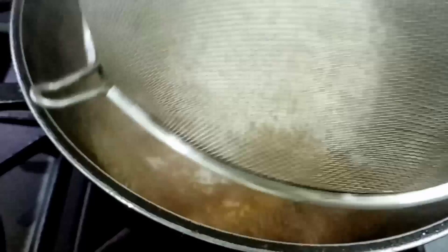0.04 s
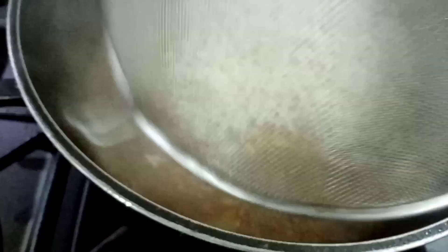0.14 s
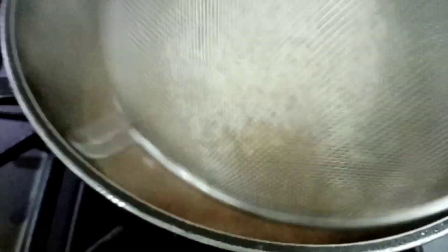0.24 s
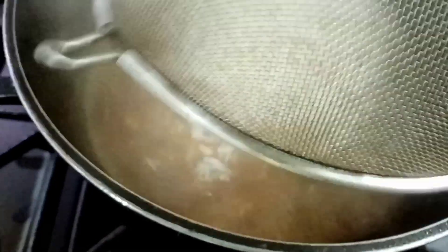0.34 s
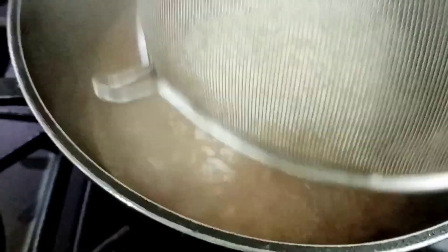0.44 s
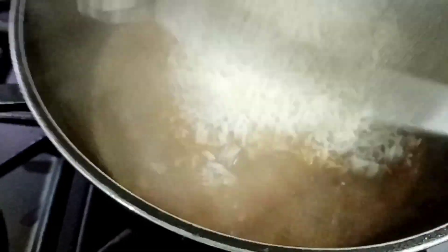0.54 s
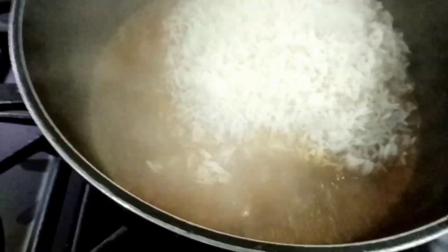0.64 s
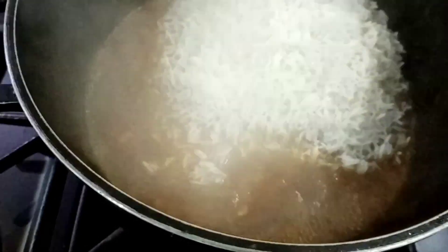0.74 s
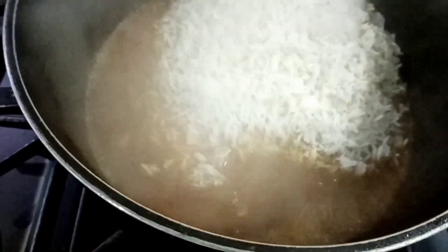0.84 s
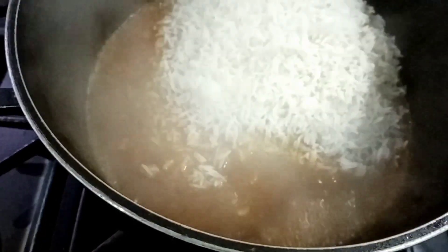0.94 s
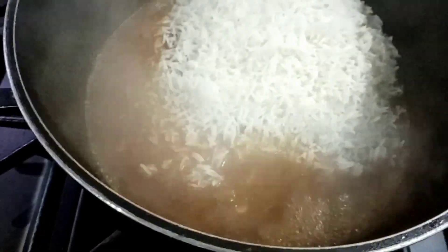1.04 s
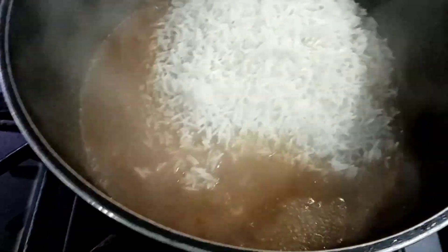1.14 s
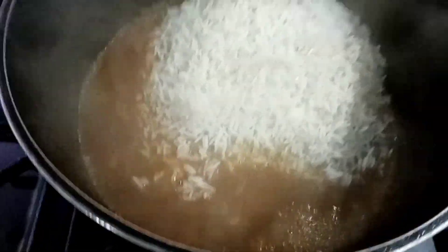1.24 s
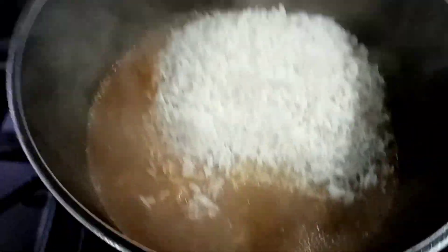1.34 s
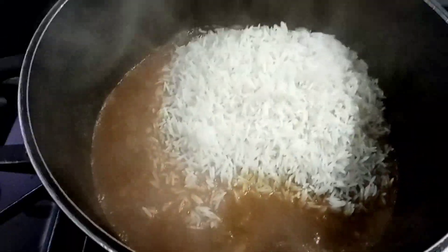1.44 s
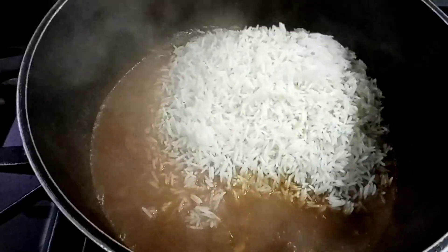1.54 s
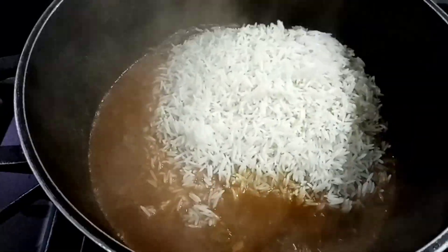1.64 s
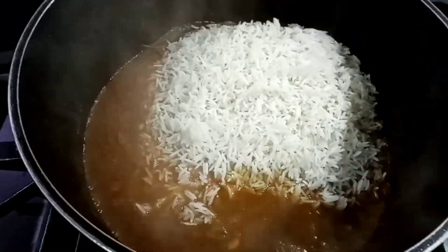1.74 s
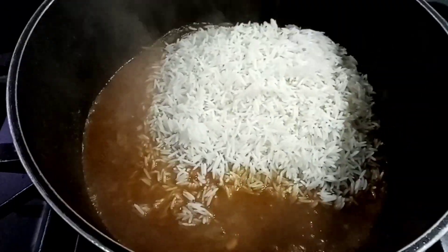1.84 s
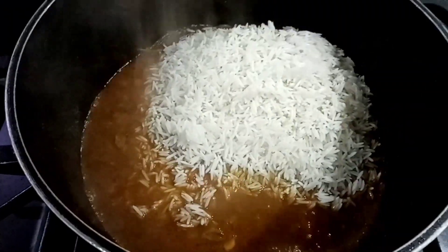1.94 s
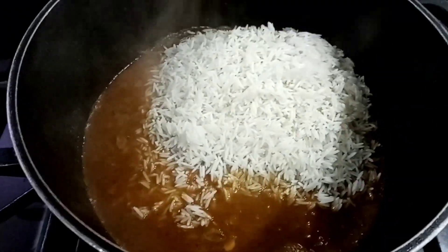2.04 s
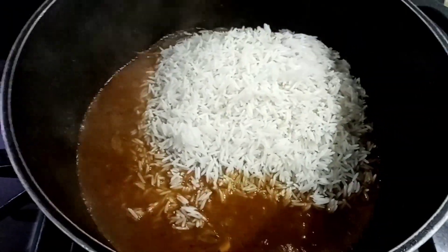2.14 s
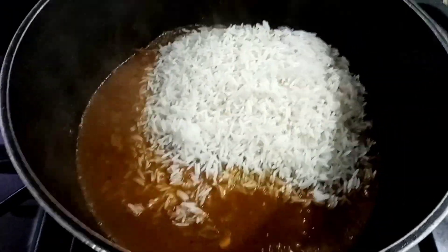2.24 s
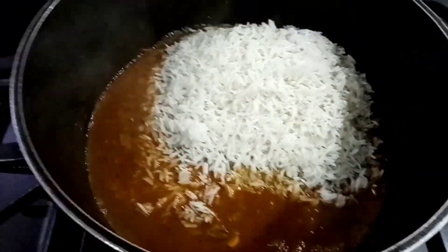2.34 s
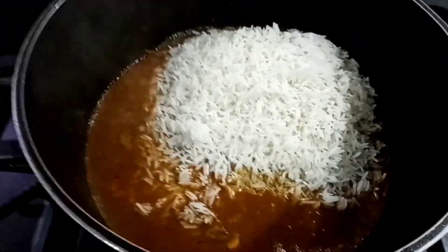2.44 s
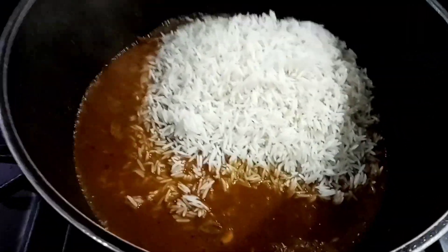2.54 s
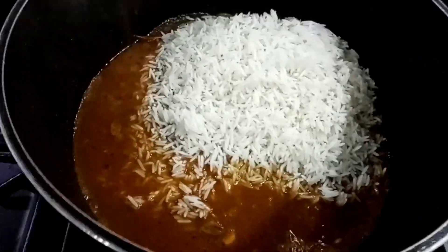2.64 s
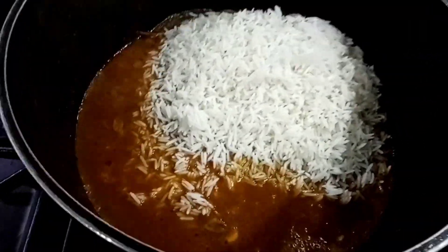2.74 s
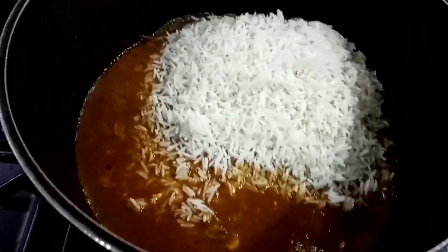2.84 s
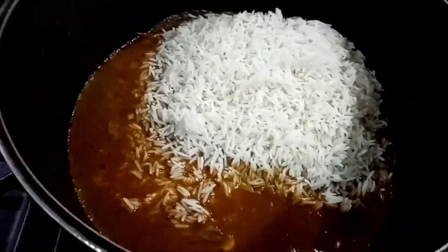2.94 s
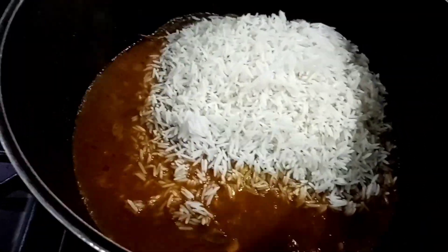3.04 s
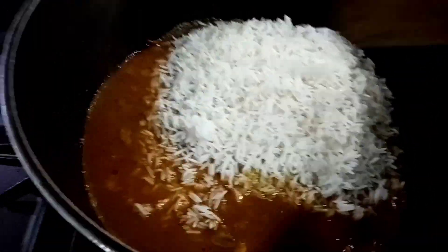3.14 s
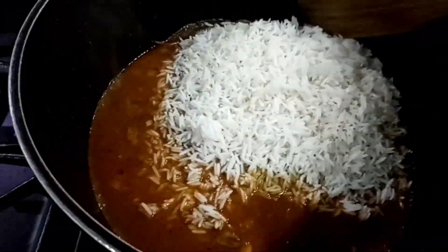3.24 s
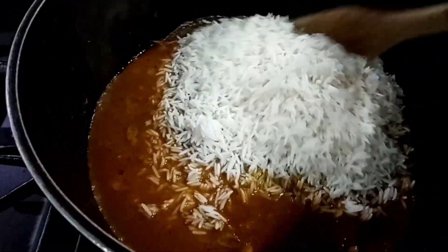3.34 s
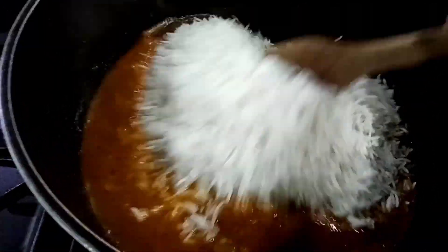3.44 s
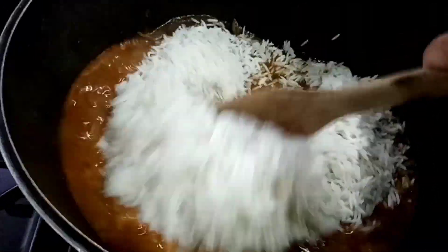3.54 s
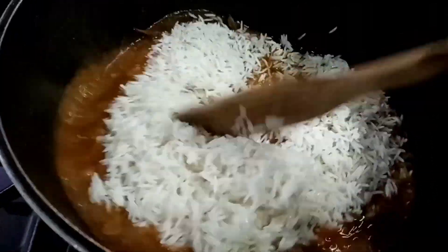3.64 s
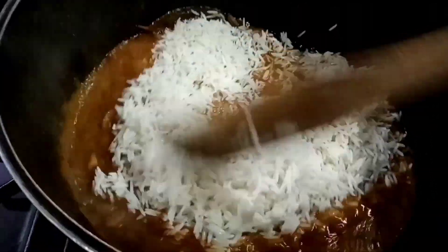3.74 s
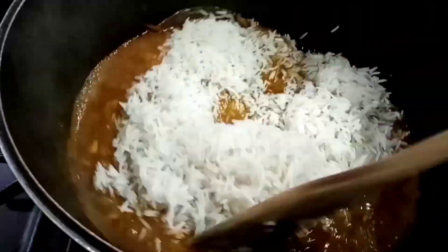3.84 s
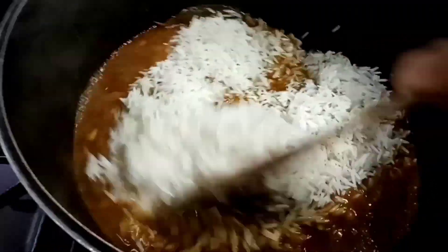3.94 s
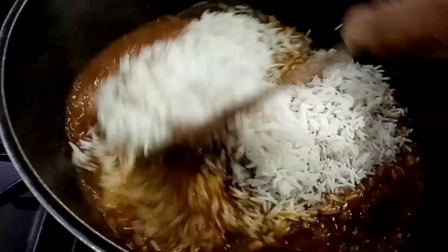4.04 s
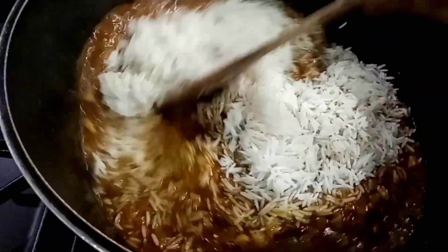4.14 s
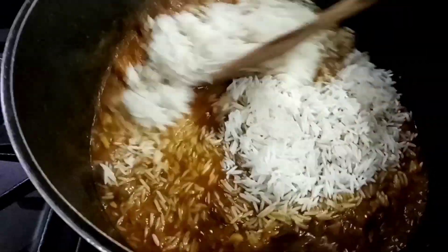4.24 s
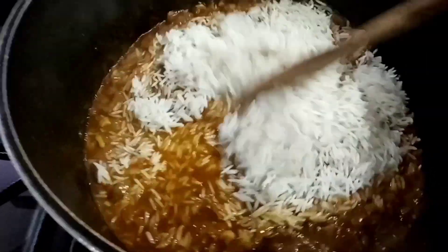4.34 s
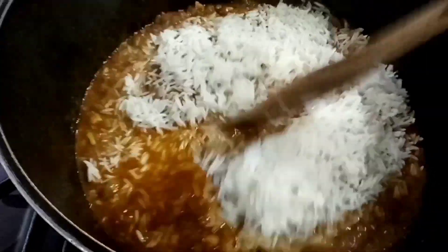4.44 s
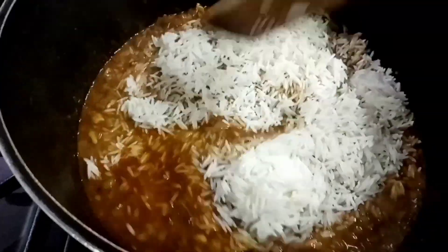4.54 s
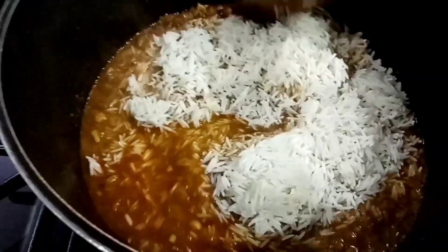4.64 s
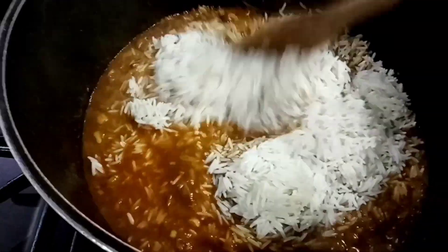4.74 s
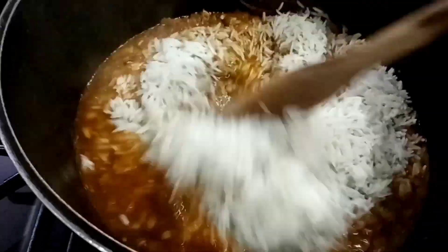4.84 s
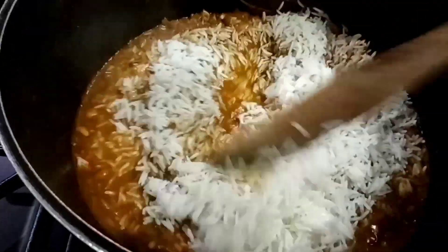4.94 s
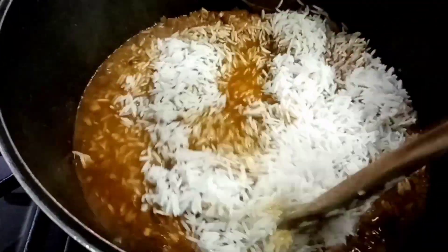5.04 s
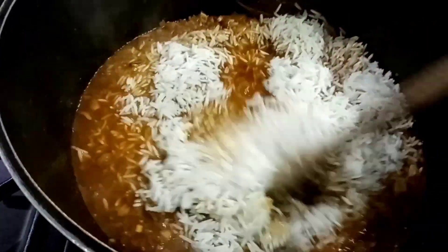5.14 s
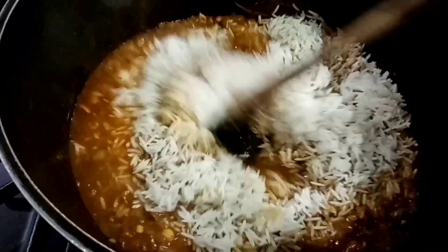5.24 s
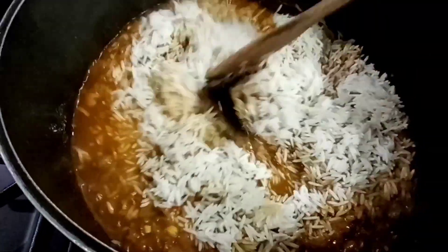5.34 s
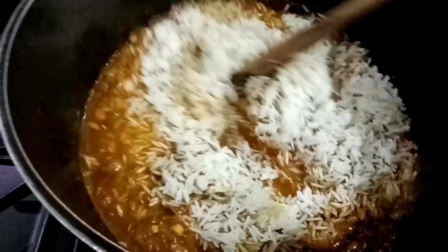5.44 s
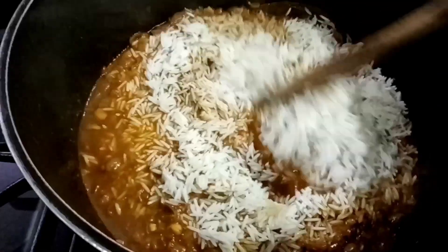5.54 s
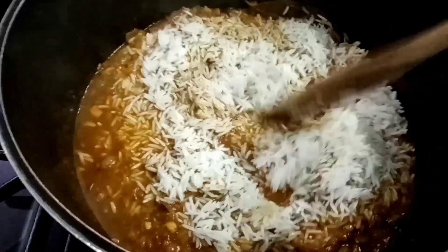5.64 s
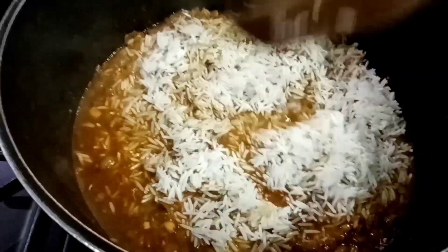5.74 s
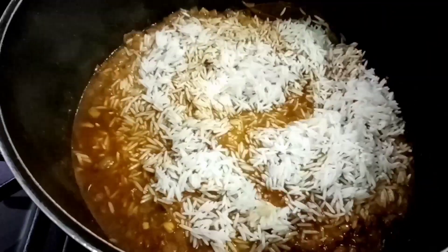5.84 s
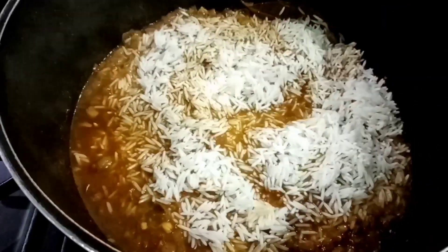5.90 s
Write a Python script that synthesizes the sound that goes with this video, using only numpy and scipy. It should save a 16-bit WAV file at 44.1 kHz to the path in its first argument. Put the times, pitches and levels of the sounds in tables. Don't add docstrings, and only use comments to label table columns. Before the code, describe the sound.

A wire strainer clangs three times on a pot rim, clatters onto a counter, then a wooden spoon rattles and stirs rice in fizzing broth.

```python
import sys
import numpy as np
from scipy import signal
from scipy.fft import rfft, irfft
from scipy.io import wavfile
from scipy.ndimage import uniform_filter1d, minimum_filter1d

SR = 44100
rng = np.random.default_rng(int(sys.argv[2]) if len(sys.argv) > 2 else 0)


def elevation(decibels):
    levels = np.asarray(decibels, float)
    return 10 ** (levels / 20)


def generate_wav(signal):
    frames = np.transpose(np.atleast_2d(signal))
    scaled = np.clip(frames, -1, 1) * 32767
    pcm = np.round(scaled).astype(np.int16)
    wavfile.write(sys.argv[1], SR, pcm)


N = 263277
T = np.arange(N) / SR
COUNTER_LEAD, HANDLE_LEAD = 15, 9


def unit(x):
    return x / np.sqrt(np.mean(x ** 2))


def peak(x):
    return x / np.abs(x).max()


def colour(x, points):
    hz, db = np.transpose(points)
    f = np.maximum(np.fft.rfftfreq(x.shape[-1], 1 / SR), 1)
    return irfft(rfft(x) * elevation(np.interp(np.log(f), np.log(hz), db)), x.shape[-1])


def band(x, lo_hz, hi_hz):
    sos = signal.butter(2, [lo_hz, min(hi_hz, SR / 2.2)], "bandpass", fs=SR, output="sos")
    return signal.sosfilt(sos, x)


def walk(rate):
    k = int(SR / rate)
    held = np.repeat(rng.standard_normal(N // k + 1), k)
    return 1.2 * uniform_filter1d(uniform_filter1d(held, k), k)[:N]


def curves(table):
    s, *columns = np.transpose(table)
    return [np.interp(T, s, c) for c in columns]


def grains(rate, spread_db):
    clicks = (rng.random(N) < rate / SR) * rng.standard_normal(N)
    return clicks * elevation(spread_db * np.minimum(rng.exponential(size=N), 5))


def glide(x, hz, width_hz, order=1):
    sos = signal.butter(order, width_hz / 2, fs=SR, output="sos")
    slow = signal.sosfilt(sos, x[0] + 1j * x[1])
    return unit((slow * np.exp(2j * np.pi * np.cumsum(hz) / SR)).real)


def aside(x, lead, left_db):
    return np.array([elevation(left_db) * x, np.roll(x, -lead)])


def ringing(modes, spot_hz, rough, chance):
    t = T[:SR // 3]
    hz, db, t60 = np.array(modes, float).T[:, :, None]
    phase = 2 * np.pi * hz * t + rough * hz / 3000 * np.cumsum(chance, axis=1)
    level_db = db - 6 * np.abs(np.log2(hz / spot_hz)) + 2 * chance[:, :1]
    return (elevation(level_db) * np.sin(phase) * 1000 ** (-t / np.minimum(t60, 0.45))).sum(0)


def thudding(hz, t60, noise):
    t = T[:SR // 3]
    decay = 1000 ** (-t / t60)
    tone = np.sin(2 * np.pi * hz * t) + 0.18 * np.sin(2 * np.pi * 1.5 * hz * t)
    return (tone + unit(band(noise, 125, 3 * hz))) * decay


def blows(events, modes, crack, contact_ms, ring_db, spot_db, spot_t60, thud_hz, thud_t60, rough,
          echo_db, rise_s=0.0017):
    out, t = np.zeros((2, N + SR)), T[:SR // 3]
    rise = 1 - np.exp(-t / rise_s)
    push = rise * np.exp(-2000 * t / contact_ms)
    for s, peak_db, spot_hz, thud_db, tilt_db in events:
        chance = rng.standard_normal((len(modes) + 1, len(t)))
        ring = ringing(modes + [(spot_hz, spot_db, spot_t60)], spot_hz, rough, chance)
        thud = peak(thudding(thud_hz, thud_t60, chance[0]) * (1 - np.exp(-t / 0.0021)))
        snap = peak(push * colour(rng.standard_normal(len(t)), crack))
        even = unit(colour(1. * (t == t[256]), crack)) * np.std(snap)
        main = np.array([snap, even]) + elevation([[ring_db], [ring_db - 8]]) * peak(ring * rise)
        main = band(colour(main, [(1000, 0.0082), (8000, tilt_db)]), 216, 17700)
        hit = main / np.abs(main[0]).max() + elevation([[thud_db], [thud_db - 4]]) * thud
        i = int(s * SR)
        out[:, i:i + len(t)] += elevation([[peak_db], [peak_db + echo_db]]) * hit
    return out[:, :N]


# pitch_hz, rms_db
HUM = [(100.2, -44.5), (200.4, -62.5), (300.6, -86)]


def hum():
    waver = .5 * walk(1.5) + .03 * walk(60)
    sway_db = 1.2 * walk(6) + 1.1 * walk(50)
    between = np.array([[.15], [0]])
    out = 0
    for k, (hz, db) in enumerate(HUM, 1):
        level = 2 ** .5 * elevation(db + sway_db + (k - 1) * 1.65 * walk(12))
        out = out + level * np.sin(2 * np.pi * hz * T + k * (waver + between))
    return out


# time_s, fizz_db
FIZZ = [(.6, -63.5), (1.8, -65), (2.1, -66), (2.56, -61.5), (2.9, -63.5), (3.25, -62), (3.5, -61),
        (4.3, -64), (4.85, -64), (5.05, -62), (5.3, -64.5), (5.8, -65)]
# freq_hz, density_db_per_hz
FIZZ_COLOUR = [(30, -22), (80, -12.5), (118, -4), (145, -16), (200, -9.5), (330, -18.5), (460, -18.5),
               (1000, -17), (1600, -22.5), (2400, -24.5), (6100, -27.5), (11000, -31.5), (16000, -23)]


def broth(shared):
    db, = curves(FIZZ)
    burst = 1 + 0.18 * unit(signal.lfilter([1], [1, -.985], np.abs(grains(34, 0.55))))
    seethe_db = 0.55 * walk(13) + 1.2 * walk(30)
    share = np.sqrt(np.clip([shared, 1 - shared], 0, 1))
    out = 0
    for hz in 32 * 2. ** np.arange(10):
        noise = rng.standard_normal((3, N))
        noise = band(share[0] * noise[0] + share[1] * noise[1:], hz / 2 ** .5, hz * 2 ** .5)
        level = burst * elevation(db + seethe_db) if hz > 1200 else elevation(np.mean(db))
        out = out + noise * elevation(0.91 * walk(7.6)) * level
    steady = colour(rng.standard_normal(N), FIZZ_COLOUR)
    return colour(out, FIZZ_COLOUR) / np.std(band(steady, 1280, 8600)) * elevation(6.5)


# time_s, level_db
SLUMP = [(.08, -76), (.095, -38), (.18, -64), (.23, -36.5), (.32, -52), (.35, -46), (.42, -43), (.55, -70)]


def slump():
    db, = curves(SLUMP)
    lumps = unit(band(grains(1500, 2.1), 330, 1140))
    lumps = lumps * elevation(db + 2.8 * walk(60.3)) * (T < SLUMP[-1][0])
    return aside(lumps, HANDLE_LEAD, -2.1)


# start_s, peak_db, spot_hz, thud_db, tilt_db (thud re peak, tilt over three octaves)
GRAZES = [(.188, -39.5, 4400, -30, -8), (.082, -43, 6300, -29, 3), (.330, -45, 6550, -31, 30),
          (.3325, -48, 6220, -34, 23), (1.077, -47.5, 1950, -11, 4), (1.083, -38, 813, -8.5, -3.5),
          (1.097, -43, 2380, -1, -11), (1.114, -52, 1130, -4, 1), (1.482, -35, 2380, -12, -2)]
# pitch_hz, level_db, t60_s
COUNTER = [(608, -2, 0.15), (712, 8.5, 0.097), (764, 5.5, 0.053), (1100, -2, 0.033), (1970, -7, 0.063),
           (2300, 9, 0.0079), (2620, -15, 0.17), (3063, 7.5, 0.029), (4780, 2, 0.025), (6940, -30, 0.013)]
# freq_hz, density_db_per_hz
COUNTER_CRACK = [(290, -16.5), (500, -1.5), (720, 1), (1100, -5), (2290, -0.5), (5310, -8.5), (6330, -7.5),
                 (7860, -8.5), (8960, -10.5), (12500, -8.5), (16000, -5.5)]


def grazes():
    return blows(GRAZES, COUNTER, COUNTER_CRACK, contact_ms=35, ring_db=-4.5, spot_db=9.5, spot_t60=0.093,
                 thud_hz=313, thud_t60=0.04, rough=0.11, echo_db=-7.5, rise_s=0.0023)


# start_s, peak_db, spot_hz, thud_db, tilt_db
KNOCKS = [(0.0862, -9.5, 6700, -20.5, 11), (0.0895, -17.5, 4200, -40, -29), (0.1000, -15, 6600, -38, 6),
          (0.1120, -18.5, 5850, -14, 14), (0.2055, -11, 4400, -18.5, -3), (0.2090, -13.5, 6110, -50, -4),
          (0.2137, -17, 3050, -49, -15), (0.3362, -8, 6400, -36, 18), (0.3385, -2.5, 6170, -23, 9.5),
          (0.3400, -5.5, 4300, -26, 7), (0.3465, -12, 6600, -44, -3)]
# pitch_hz, level_db, t60_s
STRAINER = [(1500, -7, 0.018), (4200, 6, 0.022), (8200, -1, 0.015)]
# freq_hz, density_db_per_hz
STRAINER_CRACK = [(300, -13), (800, -31), (1500, 1.5), (2400, -4), (3100, -3), (4300, 1.5), (5300, 0),
                  (6400, 3), (8500, -0.5), (12500, -3), (16000, 4)]


def knocks():
    return blows(KNOCKS, STRAINER, STRAINER_CRACK, contact_ms=3.5, ring_db=-5, spot_db=12, spot_t60=0.0091,
                 thud_hz=228, thud_t60=0.46, rough=0.0065, echo_db=-7)


# pitch_hz, t60_s, left_over_right_db
RIM = [(1780, 0.35, 0), (1900, 0.1, 5.5), (2036, 0.64, -1), (2400, 0.79, 7), (2664, 0.26, -4),
       (2966, 0.31, -4), (3126, 0.25, 8), (3420, 0.44, 2), (3530, 0.23, -2), (4180, 0.12, -2),
       (4387, 0.15, 0), (5850, 0.079, 9), (6500, 0.48, -2), (6600, 0.17, -5)]
RIM_STRUCK_S = (0.1, .207, .339)
# first_db, second_db, third_db
RIM_SWING = [(-43.5, -65, -61), (-58, -36, -56), (-49, -34, -45), (-54, -49, -48.5), (-43, -36, -36),
             (-49, -27, -39), (-47, -29, -37), (-45, -46, -38), (-38, -33, -46), (-32, -30, -21.5),
             (-32, -16, -31), (-36, -27, -40), (-46, -46, -47), (-40, -30, -38)]


def clang():
    out = np.zeros((2, N))
    hz, t60, pan_db = np.array(RIM).T[:, :, None]
    ends = tuple(RIM_STRUCK_S[1:]) + (1,)
    for s, until, db in zip(RIM_STRUCK_S, ends, np.array(RIM_SWING).T[:, :, None]):
        t = T[:int((until - s) * SR)]
        phase = 2 * np.pi * (hz * t + rng.random((2, len(hz), 1)))
        drift = np.cumsum(rng.standard_normal((len(hz), SR)), axis=1)[:, :len(t)]
        phase = phase + 0.021 * hz / 3000 * drift
        swing = elevation(db + np.array([pan_db, -pan_db]) / 2) * 1000 ** (-t / t60) * (1 - np.exp(-t / 0.0021))
        i = int(s * SR)
        out[:, i:i + len(t)] += (swing * np.sin(phase)).sum(1) * np.minimum((t[-1] - t) / .004, 1)
    return out


# start_s, peak_db, pitch_hz
POPS = [(0.654, -40, 1990), (0.8994, -39, 2100), (0.9398, -56, 7440), (1.041, -36, 2020),
        (1.8357, -40, 3590), (1.8806, -39, 6100), (2.08, -39, 6370), (2.1989, -38, 5700),
        (2.234, -37, 4400), (2.2974, -39, 1920), (2.6574, -39, 6220), (2.7057, -46, 6090),
        (2.7424, -42, 8630), (2.847, -37.5, 4220), (3.6067, -51, 5830), (3.943, -37.5, 1855),
        (4.218, -41, 2550), (4.6224, -37.5, 6030), (4.87, -62, 5100), (4.9872, -41, 1870),
        (5.0576, -38, 1787), (5.36, -43, 4340), (5.682, -40, 6940)]


def pops():
    out, t = np.zeros(N + SR), T[:1024]
    decay = np.exp(-t / 0.0049)
    for s, db, hz in POPS:
        spray = band(rng.standard_normal(len(t)), 4500, 15600) * decay
        ring = .5 * np.sin(2 * np.pi * hz * t * (1 + 12 * t)) * decay
        i = int(s * SR)
        out[i:i + len(t)] += elevation(db - 9.5) * (spray + ring)
    return out[:N]


# start_s, peak_db, spot_hz, thud_db, tilt_db
SET_DOWN = [
    (1.196, -29.5, 2170, -18, -1),
    (1.2512, -8, 4464, -28, -4.5),
    (1.2535, -18, 1900, -16, -19),
    (1.2575, -17, 3160, -5, 4),
]
# start_s, peak_db, spot_hz, thud_db, tilt_db
SETTLE = [(1.4912, -17, 635, -1, -5), (1.4940, -14.5, 2980, -12, -3), (1.4970, -13, 2300, -37, -5),
          (1.4985, -18.5, 6300, -6, 11), (1.5090, -16, 2380, -8, 4), (1.5185, -21, 800, -15, 0),
          (1.5395, -18.5, 2290, -13, -16), (1.5430, -28, 750, -21, -21), (1.5715, -19.5, 2520, -8.5, -12),
          (1.5740, -26, 784, -15, -7)]


def put_down():
    land = blows(SET_DOWN, COUNTER, COUNTER_CRACK, contact_ms=3.1, ring_db=-4, spot_db=8.5, spot_t60=0.02,
                 thud_hz=326.5, thud_t60=0.052, rough=0.1, echo_db=-2.5)
    rock = blows(SETTLE, COUNTER, COUNTER_CRACK, contact_ms=3.5, ring_db=-2, spot_db=12, spot_t60=0.019,
                 thud_hz=316, thud_t60=0.054, rough=0.064, echo_db=-9)
    return land + rock


# start_s, length_s, level_db, hollow_hz
STROKES = [(2.21, 0.78, -67, 997), (3.096, 0.44, -57, 974), (3.45, 0.67, -59.5, 984),
           (4.114, 0.26, -61.5, 1057), (4.597, 0.724, -61.5, 1022), (5.45, .5, -67, 1029)]


def strokes(lag_s):
    level = elevation(-75)
    for s, length, db, _ in STROKES:
        level = level + elevation(db) * np.sin(np.pi * np.clip((T - s - lag_s) / length, 0, 1))
    return level


def stir():
    s, length, _, hz = np.transpose(STROKES)
    jerk_db, lap_db = 2.2 * walk(30), 2.5 * walk(14)
    hz = np.interp(T, s + length / 2, hz) * (1 + 0.021 * walk(12))
    rice = np.array([grains(900, 2.5), grains(900, 2.5)])
    hollow = glide(rice, hz, 190, order=2) * elevation(jerk_db) * strokes(0)
    slosh = unit(band(rng.standard_normal(N), 203, 540))
    return hollow + slosh * elevation(1.5 + lap_db) * strokes(lag_s=0.1)


# start_s, loudest_s, end_s, level_db, ring_hz (when loudest)
DRAGS = [(2.40, 2.45, 2.49, -49, 3200), (2.503, 2.508, 2.535, -49.5, 3020), (2.54, 2.58, 2.605, -53, 3130)]
# time_s, over_common_slip_db
CATCHES = [(2.4315, 10), (2.451, 17), (2.507, 10), (2.571, 12), (2.585, 17)]


def rub():
    fade_db, rise_hz_s = -11, 2500
    gain, hz = np.zeros(N), np.full(N, 1. * DRAGS[0][4])
    for start, top, end, db, ring_hz in DRAGS:
        on = (T > start) & (T < end)
        gain[on] = elevation(db + np.interp(T[on], [start, top, end], [fade_db, 0, fade_db]))
        hz[on] = ring_hz + rise_hz_s * (T[on] - top)
    slips = np.array([grains(600, 1.), grains(600, 1.)])
    for s, db in CATCHES:
        slips[0, int(s * SR)] = elevation(db)
    tone = glide(slips, hz, 150)
    tone = tone + elevation(-12) * glide(slips, 1.33 * hz, 300) + elevation(-11) * glide(slips, 1.88 * hz, 400)
    return tone * gain


# start_s, peak_db, spot_hz, thud_db, tilt_db
PICK_UP = [(3.1470, -32, 6200, 0, 19), (3.1625, -30, 4200, 3.5, 5), (3.166, -34, 2650, 9, 3),
           (3.191, -31.5, 8500, 6, 4), (3.2040, -26.5, 2620, -3, 0), (3.2060, -28.5, 1450, -13, 0),
           (3.221, -26.5, 1500, -15, -2), (3.2265, -32, 5200, 1, 6), (3.2350, -25.5, 3330, -9, -3),
           (3.259, -44, 1900, 10.5, -6)]
# pitch_hz, level_db, t60_s
JAR = [(556, -9, 0.04), (1020, -1, 0.05), (1500, 13.5, 0.055), (2650, 7.5, 0.088), (3390, -1, 0.04),
       (4200, 10, 0.076)]
# freq_hz, density_db_per_hz
WOOD_CRACK = [(290, 13), (600, -9.5), (1500, 7.5), (2600, 10.5), (3500, -3.5), (6500, -4), (11800, -12),
              (16000, -24)]


def pick_up():
    return blows(PICK_UP, JAR, WOOD_CRACK, contact_ms=3.5, ring_db=-2, spot_db=0, spot_t60=0.02,
                 thud_hz=215, thud_t60=0.19, rough=0.16, echo_db=-7.5)


# start_s, peak_db, spot_hz, thud_db, tilt_db
TAPS = [(3.4035, -37, 1310, -3.5, -8.5), (3.425, -51, 904, 6, -2), (3.8445, -33.5, 960, -13.5, -47),
        (4.232, -37, 1500, -3, -2), (4.257, -51, 1480, 1, -6), (5.069, -49.5, 600, -1, 1),
        (5.1755, -41.5, 1100, -1.5, -12), (5.198, -47.5, 1043, -1, -10), (5.454, -39.5, 1410, -3, -2),
        (5.485, -49, 1400, 5, -1), (5.252, -61, 602, -6, -20), (5.509, -59, 904, 12.5, -10)]
# pitch_hz, level_db, t60_s
POT_FLOOR = [(542, 14, 0.034), (1013, -7, 0.046), (1480, 6, 0.03), (2620, 11, 0.023), (1140, -7, 0.022)]


def taps():
    return blows(TAPS, POT_FLOOR, WOOD_CRACK, contact_ms=5.5, ring_db=1.5, spot_db=5, spot_t60=0.019,
                 thud_hz=318, thud_t60=0.11, rough=0.1, echo_db=-4.5)


# start_s, peak_db, spot_hz, thud_db, tilt_db
LAST_TOUCH = [(5.955, -36, 2370, -5, -6)]


def last_touch():
    return blows(LAST_TOUCH, COUNTER, COUNTER_CRACK, contact_ms=29, ring_db=-29, spot_db=-16, spot_t60=0.039,
                 thud_hz=335, thud_t60=0.03, rough=0.03, echo_db=-20, rise_s=0.0027)


def nearby(x, db, fade_ms, above_hz):
    t = T[:512]
    scatter = band(rng.standard_normal((2, len(t))) * np.exp(-1000 * t / fade_ms), above_hz, SR / 2)
    scatter = scatter / np.sqrt(np.sum(scatter ** 2, axis=1, keepdims=True))
    return signal.fftconvolve(x, elevation(db) * scatter + (t == 0), axes=1)[:, :N]


# freq_hz, t60_s
KITCHEN_T60 = [(150, 0.55), (700, 0.72), (2500, 0.61), (6000, 0.53), (14000, 0.34)]


def kitchen(x, first_ms, swell_ms, shared):
    t, tail = T[:SR], 0
    hz, t60 = np.transpose(KITCHEN_T60)
    for f in 90 * 2. ** np.arange(8):
        noise = rng.standard_normal((3, SR))
        noise = np.sqrt(shared) * noise[0] + np.sqrt(1 - shared) * noise[1:]
        decay = 1000 ** (-t / np.interp(np.log(f), np.log(hz), t60))
        tail = tail + band(noise, f / 2 ** .5, f * 2 ** .5) * decay
    tail = tail / (1 + np.exp(-(1000 * t - first_ms) / swell_ms))
    return signal.fftconvolve(x[None], tail / np.sqrt(np.sum(tail[1] ** 2)), axes=1)[:, :N]


def scene():
    strainer, counter, brushes = knocks(), put_down(), grazes()
    jar, spoon, touch, scuff = pick_up(), taps(), last_touch(), rub()
    near = elevation(0.5) * strainer + elevation(9.5) * spoon + jar
    far = elevation(2) * counter + elevation(18) * brushes
    lean = (elevation([[1], [0]]) - 1) * strainer[0]
    dry = near[0] + lean + aside(far[0], COUNTER_LEAD, -4.1)
    dry = dry + elevation(11) * aside(touch[0], COUNTER_LEAD, -29) + stir() + pops()
    wet = near[1] + np.roll(far[1], int(0.0065 * SR)) + elevation(-28) * scuff
    direct = nearby(dry, db=-4, fade_ms=1, above_hz=2260) + aside(scuff, HANDLE_LEAD, -7.5)
    echoes = kitchen(wet, first_ms=5.7, swell_ms=0.19, shared=0.022)
    return direct + echoes + broth(shared=0.0099) + hum() + clang() + slump()


def limiter(x):
    limit_db, look_ahead_s = -4, .016
    ahead = int(look_ahead_s * SR)
    need = np.minimum(1, elevation(limit_db) / (np.abs(x).max(0) + 1e-9))
    return x * uniform_filter1d(np.roll(minimum_filter1d(need, ahead), -ahead // 4), ahead // 2)


# freq_hz, gain_db
LEFT_PORT = [(60, 0), (250, -1.5), (700, -3), (2400, -1.5), (7000, -0.5), (9000, -9.5), (10500, -49),
             (15000, -80)]
# freq_hz, gain_db
MIC = [(30, 2), (75, -2), (5000, 0.9), (6300, 3.5), (7600, 0.5), (9200, 4), (11000, -3), (13300, -8),
       (14600, -2.5), (15500, 0.5), (15800, -43)]


def ports(x):
    port_lag = 37
    hiss_level = elevation(-85 + 1.6 * walk(15))
    hiss = band(band(rng.standard_normal((2, N)), 15000, 16600), 15000, 16600)
    heard = x + hiss_level * unit(hiss)
    both = np.array([colour(heard[0], LEFT_PORT), np.roll(heard[1], port_lag)])
    return colour(both, MIC)


def top_cut(x):
    return signal.sosfilt(signal.butter(12, 16480, fs=SR, output="sos"), x)


def record(dry):
    mix = limiter(ports(dry))
    return top_cut(mix)


dry = scene()
out = record(dry)
generate_wav(out)
```